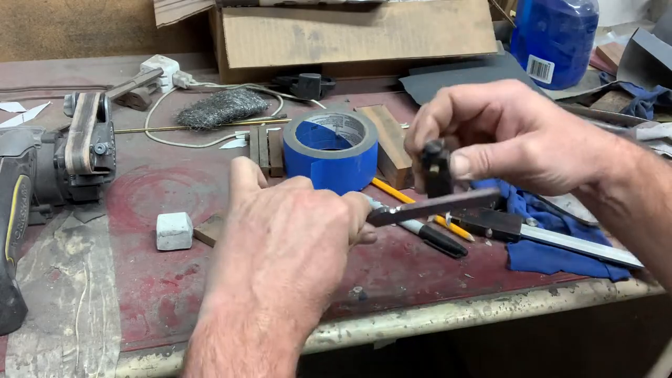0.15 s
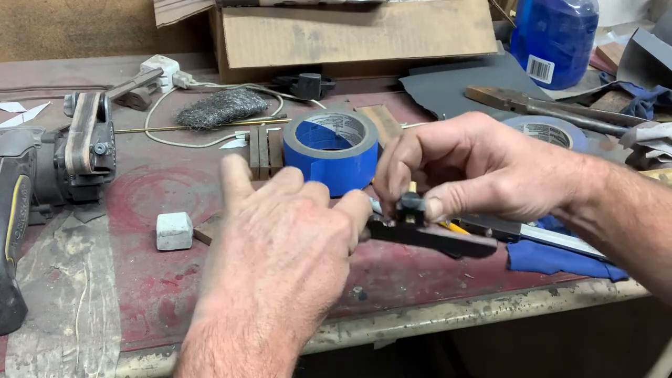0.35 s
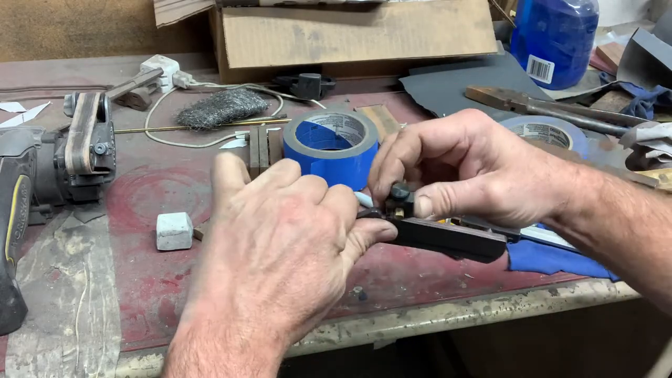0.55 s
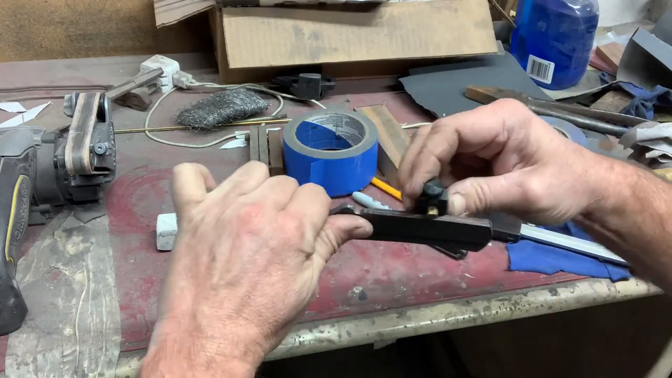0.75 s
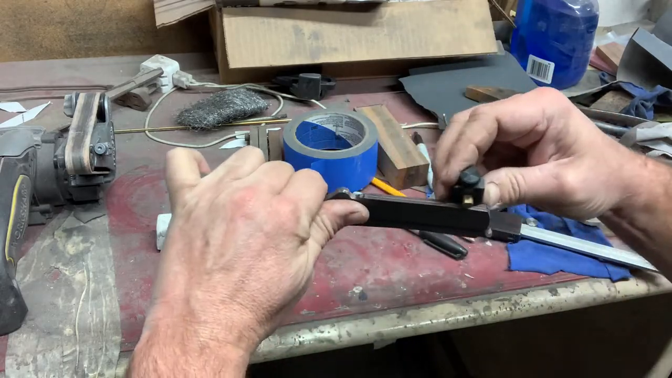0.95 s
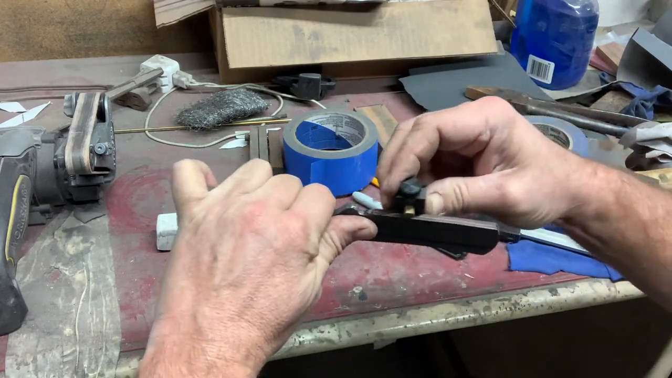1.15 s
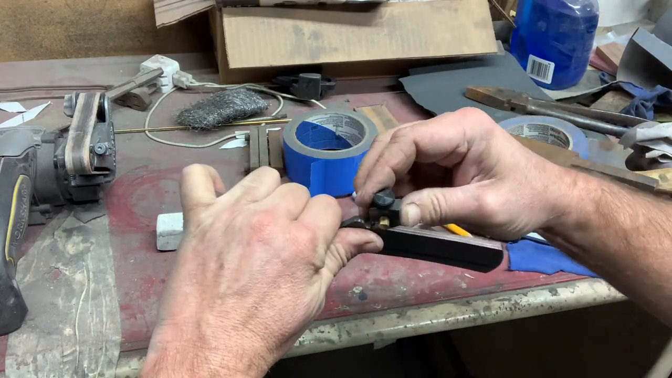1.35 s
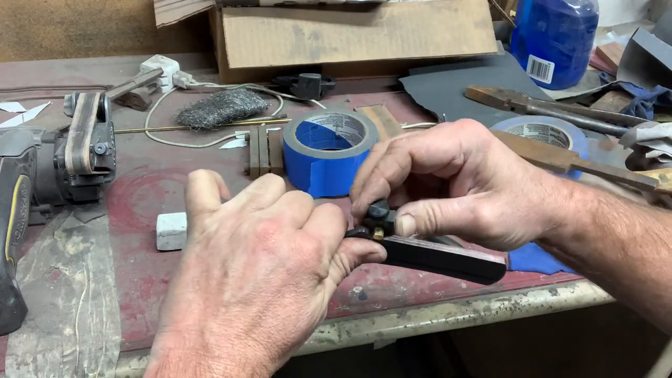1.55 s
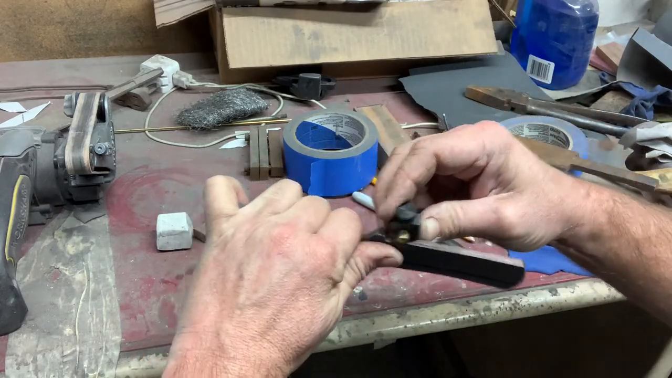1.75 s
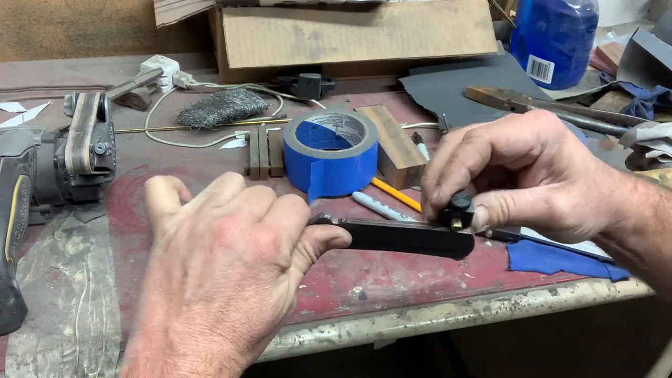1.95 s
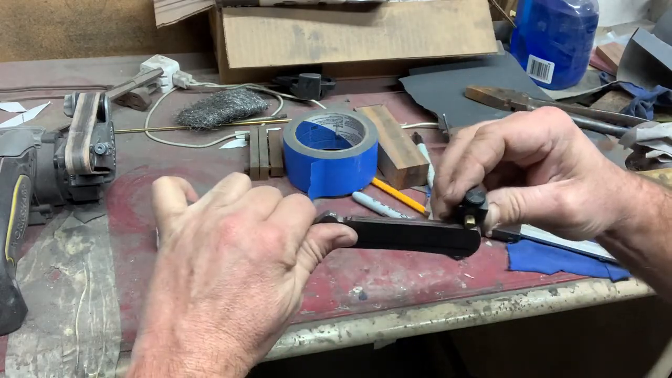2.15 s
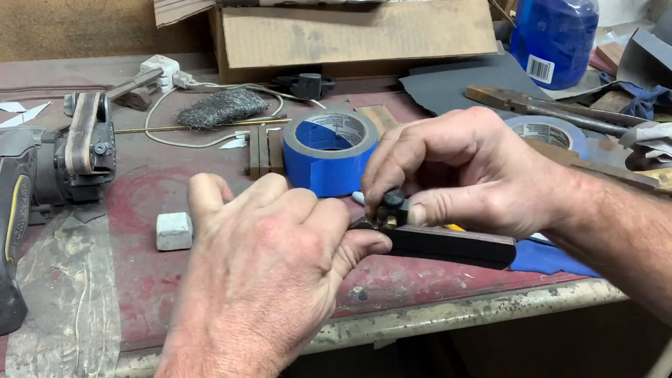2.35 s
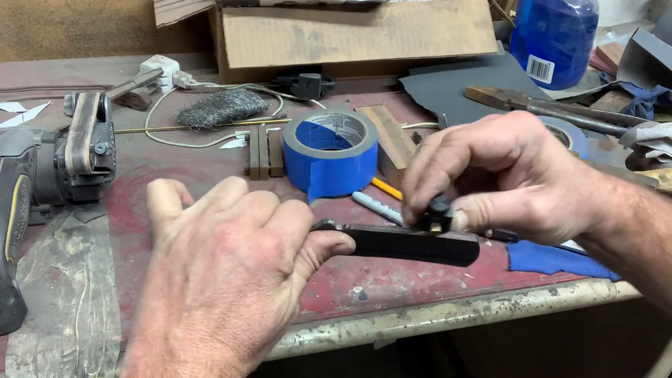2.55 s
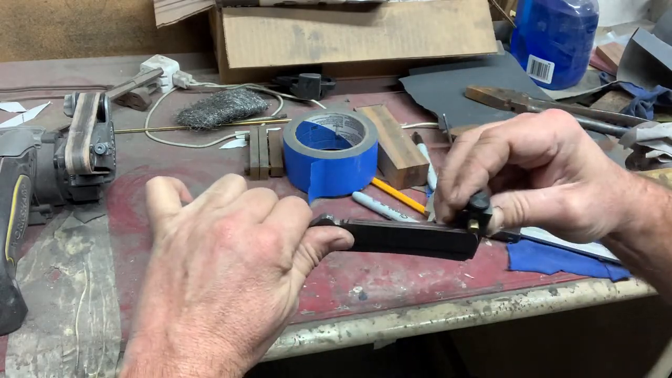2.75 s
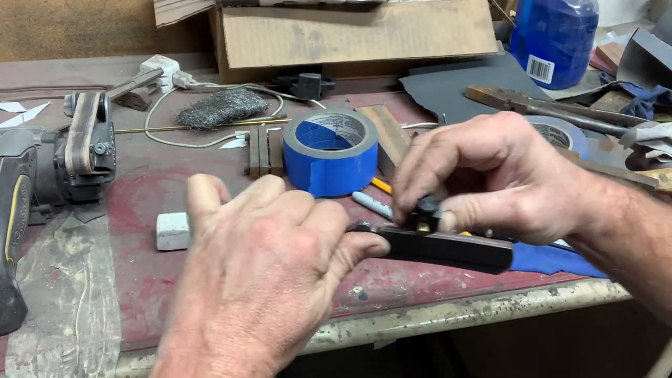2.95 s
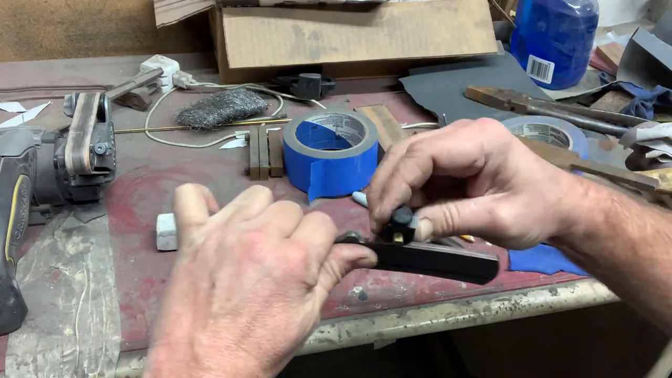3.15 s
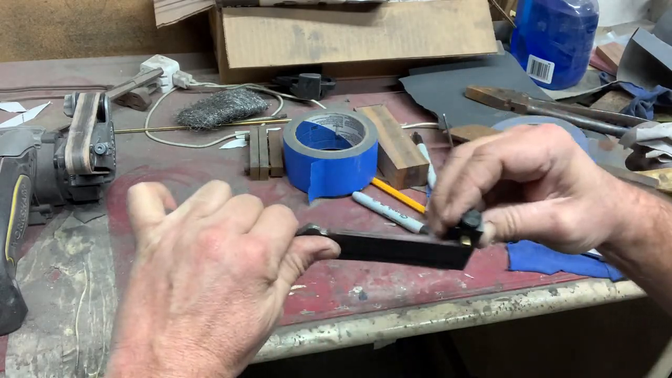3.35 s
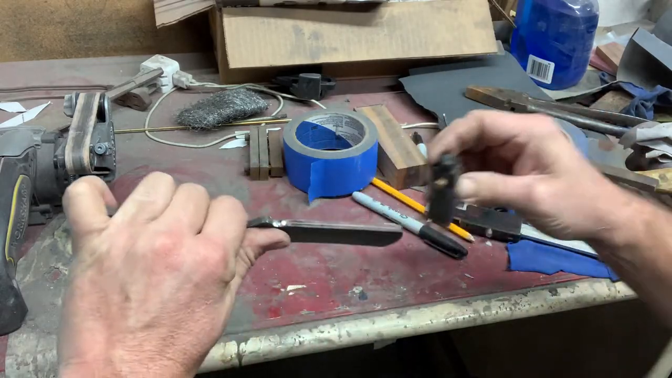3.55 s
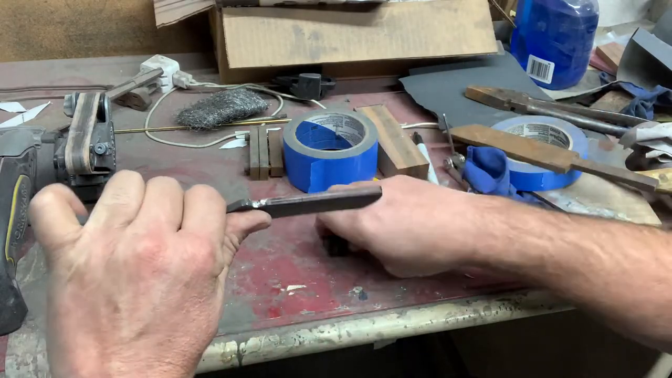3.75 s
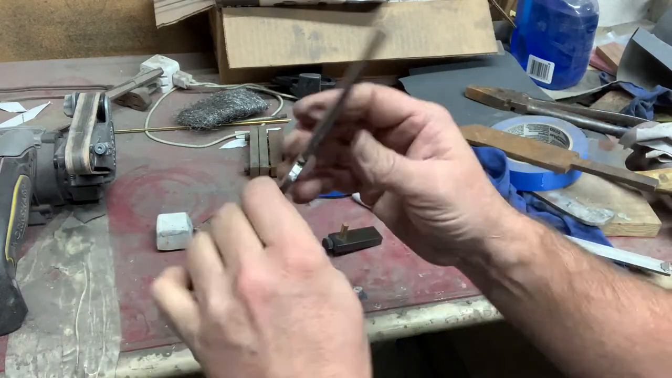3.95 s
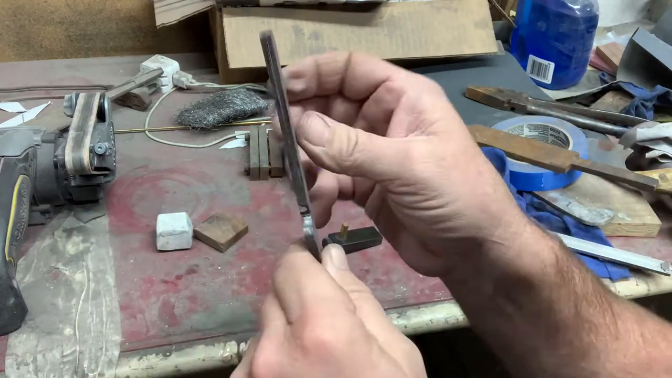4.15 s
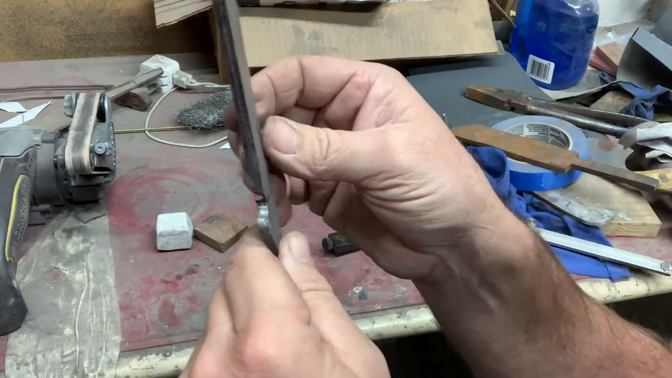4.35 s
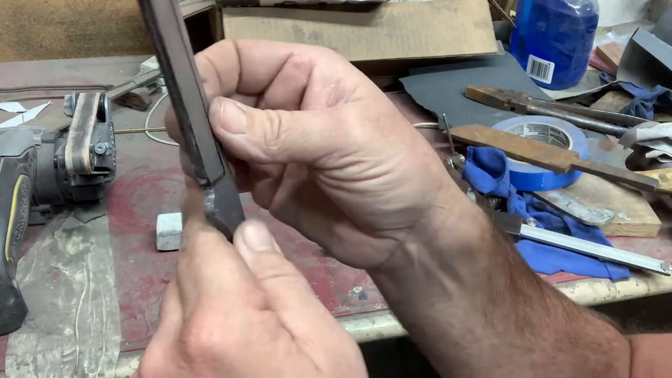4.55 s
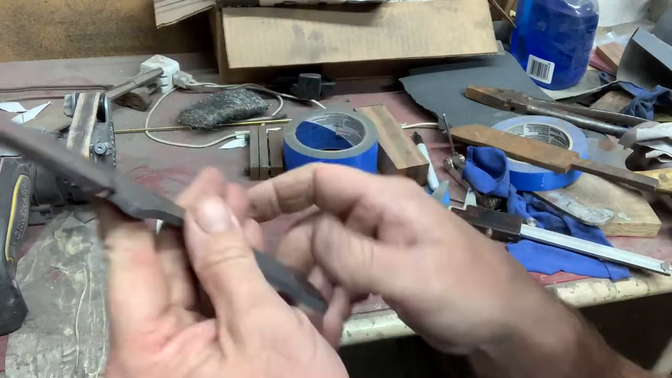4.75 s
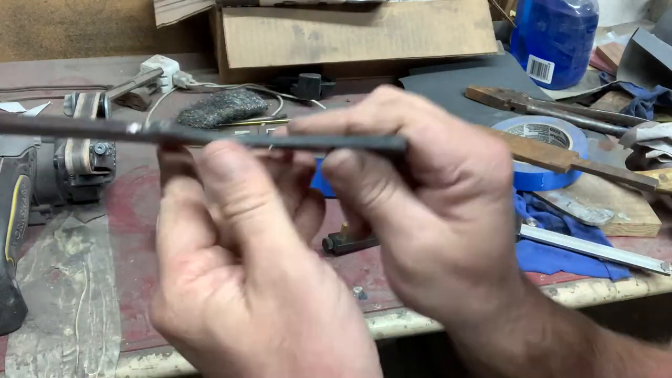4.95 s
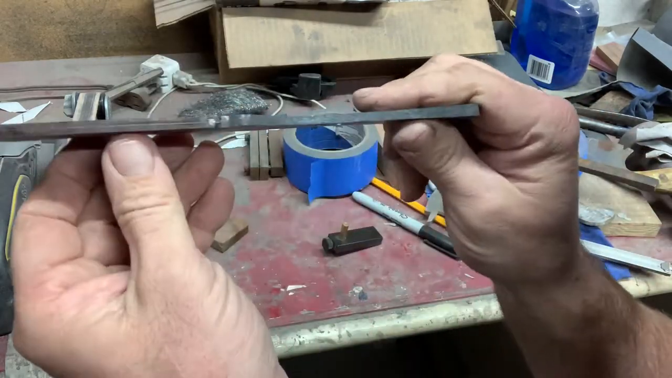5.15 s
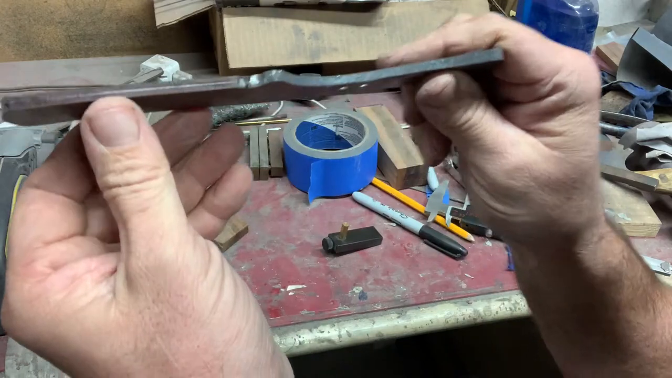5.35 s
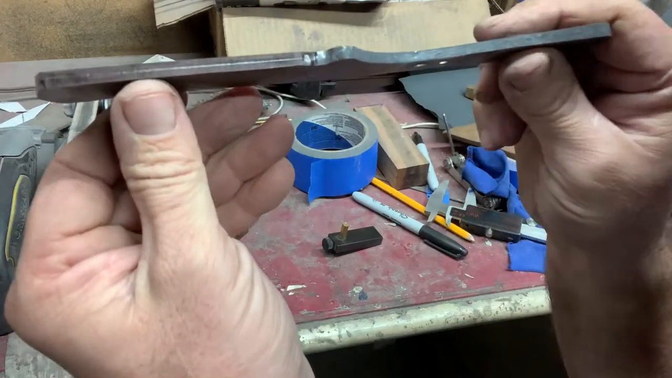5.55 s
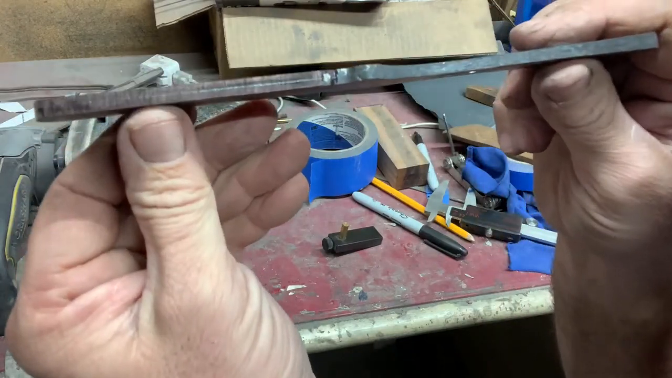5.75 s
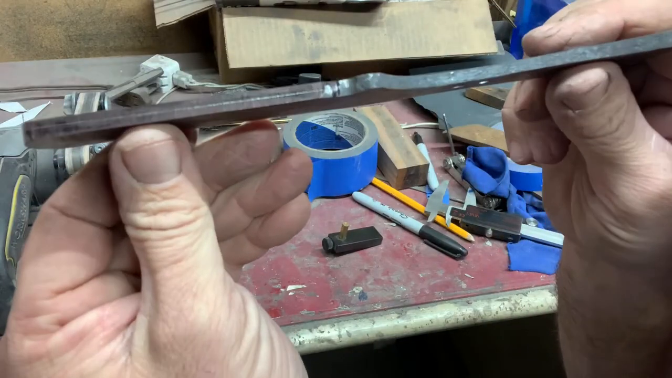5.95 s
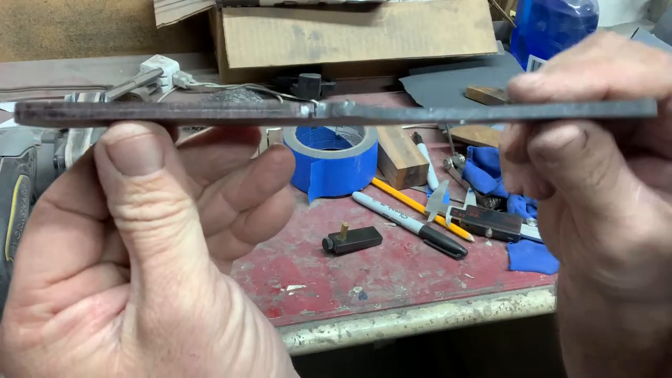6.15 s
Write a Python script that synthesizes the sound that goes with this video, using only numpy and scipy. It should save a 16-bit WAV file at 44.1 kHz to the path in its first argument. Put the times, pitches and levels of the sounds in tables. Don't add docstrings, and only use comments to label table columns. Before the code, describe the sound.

Short, sharp, gritty metal scrapes with bright clicks on a steel blank, then a knock on a bench and faint handling, over low workshop hum.

```python
import sys
import numpy as np
from scipy import signal
from scipy.fft import rfft, irfft, next_fast_len
from scipy.io import wavfile
from scipy.ndimage import uniform_filter1d

SR = 44100
rng = np.random.default_rng(int(sys.argv[2]) if len(sys.argv) > 2 else 0)


def store_wav(level_fs):
    pcm = np.round(np.clip(np.atleast_2d(level_fs), -1, 1) * 32767)
    wavfile.write(sys.argv[1], SR, pcm.T.astype(np.int16))


def natural_amplitude(level_db):
    exponent = np.asarray(level_db, float) / 20
    return 10 ** exponent


N = 273861


def evened(x):
    return x / np.sqrt(np.mean(x ** 2) + 1e-20)


def read(points, hz):
    f, value = np.transpose(points)
    return np.interp(np.log(hz + 1), np.log(f + 1), value)


def resonate(x, hz, width_hz):
    return signal.lfilter(*signal.iirpeak(hz, hz / width_hz, SR), x)


def coloured(points, shares=1):
    hz = np.fft.rfftfreq(512, 1 / SR)
    taps = np.fft.fftshift(irfft(natural_amplitude(read(points, hz)) * shares), axes=-1) * np.hanning(512)
    return taps / np.linalg.norm(taps, axis=-1, keepdims=True)


def envelope_db(start, length, level_db, change_db, rise, fall, lift_db=0, lift_s=0.03):
    t = np.arange(N) / SR - start
    after = np.maximum(t - length, 0)
    hold_db = level_db + change_db * np.clip(t / max(length, 1e-3), 0, 1)
    return hold_db + rise * np.minimum(t, 0) - lift_db * np.minimum(after / lift_s, 1) - fall * after


# frequency in Hz, level in dB per Hz.
AIR_SPECTRUM = [(15, -77.5), (25, -50), (48, -30.5), (61, -29.5), (76, -3), (202, -6), (265, -14.5),
                (408, -13.5), (443, -13), (741, -13), (1080, -16.5), (1210, -15.5), (3980, -28),
                (12100, -53), (16300, -64.5)]
# frequency in Hz, likeness from -1 to 1.
AIR_LIKENESS = [(60, 0.61), (110, 1), (200, 0.69), (380, 0.79), (700, 0.2), (1290, -0.33), (2380, -0.41),
                (4400, -0.044), (8120, 0.4), (15000, 1)]
# frequency in Hz, level in dB.
AIR_LEFT_DB = [(60, -2.5), (110, 0.5), (200, -0.5), (380, 2), (700, -2.5), (1290, -2.5), (2380, -2),
               (4400, -0.5), (8120, -1), (15000, -8)]


def air(level_db=-47.5, patchy_db=1.2, swell_db=0.35):
    frames, hz = N // 512 + 5, np.fft.rfftfreq(2048, 1 / SR)
    a, b, c, d, patches = rng.standard_normal((frames, 1025, 5)).T
    patches = evened(uniform_filter1d(uniform_filter1d(patches, 20, 0), 8, 1))
    swell = evened(uniform_filter1d(rng.standard_normal(frames), 20))
    same = np.clip(read(AIR_LIKENESS, hz), -1, 1)[:, None]
    left = a + 1j * b
    right = same * left + np.sqrt(1 - same ** 2) * (c + 1j * d)
    z = np.array([left, right])
    z *= natural_amplitude(read(AIR_SPECTRUM, hz)[:, None] + patchy_db * patches + swell_db * swell)
    z *= natural_amplitude(np.outer([0.5, -0.5], read(AIR_LEFT_DB, hz)))[:, :, None]
    rush = signal.istft(z, nperseg=2048, noverlap=1536)[1][:, :N]
    return natural_amplitude(level_db - 4) * evened(rush)


# frequency in Hz, width in Hz, level in dB.
HUM_LINES = [(94.2, 9.1, -65.5), (125.4, 18.5, -57), (162.04, 11.5, -55), (201.36, 6, -59),
             (240.2, 3.2, -67.5), (282.2, 29, -65), (364.4, 11, -70.5), (403.5, 1.54, -66), (713, 21, -70),
             (755.6, 25, -69.5), (820, 17, -77.5), (929, 7.1, -74.5), (1183, 21, -78.5)]


def hum():
    out = np.zeros(N)
    for hz, width_hz, db in HUM_LINES:
        line = resonate(rng.standard_normal(N), hz, width_hz)
        out += natural_amplitude(db) * evened(resonate(line, hz, width_hz))
    return out


# time in seconds, level in dB.
TOUCHES = [
    (5.621, -57),
    (5.826, -61),
]
# frequency in Hz, level in dB per Hz.
TOUCH_SPECTRUM = [(1200, -20), (2200, 0), (5000, -1), (9000, -6), (16000, -12)]


def touches(t60_s=0.03):
    t, out = np.arange(2000) / SR, np.zeros(N)
    for s, peak_db in TOUCHES:
        puff = np.convolve(rng.standard_normal(len(t)), coloured(TOUCH_SPECTRUM), "same")
        out[round(s * SR):][:len(t)] += natural_amplitude(peak_db - 60 * t / t60_s) * puff
    return out


# start in seconds, length in seconds, skin rub in dB, fine top in dB above the rub.
FINGER_RUBS = [
    (3.822, 0.047, -66, -5),
    (4.164, 0.065, -84, -11.5),
    (4.305, 0.075, -79.5, -17),
    (4.543, 0.018, -74, -13),
    (4.627, 0.035, -83, -9),
    (4.768, 0.043, -73.5, -14),
    (4.876, 0.038, -75, -12),
    (5.2, .04, -81, -29),
    (5.32, 0.032, -86, -11),
    (5.407, .03, -91, -10),
]
# frequency in Hz, level in dB per Hz.
SKIN_SPECTRUM = [(3000, -25), (7000, 1), (12000, -2), (16000, -15)]


def fingers(rise_db_per_s=606, fall_db_per_s=392):
    level = np.zeros((2, N))
    for start, length, rub_db, top_db in FINGER_RUBS:
        rub = envelope_db(start, length, rub_db, 0, rise_db_per_s, fall_db_per_s)
        level += natural_amplitude(rub + np.array([[0], [top_db + 11]]))
    level = uniform_filter1d(level, 200, axis=1)
    above = 1 / (1 + (13300 / (np.fft.rfftfreq(512, 1 / SR) + 1)) ** 24)
    colours = coloured(SKIN_SPECTRUM, np.array([1 - above, above]))
    noise = rng.standard_normal((2, N))
    return sum(signal.oaconvolve(gain * noise, taps[None], "same") for gain, taps in zip(level, colours))


# time in seconds, level in dB, contact in seconds, dullness in dB per octave.
BLOWS = [
    (3.7228, -15, .004, 0),
    (3.733, -31, .003, -5),
    (3.7575, -20.5, .0035, -8),
    (3.82, -50, .004, -2),
]
# frequency in Hz, level in dB, T60 in seconds.
BENCH_MODES = [(390, -32, .06), (560, -31, .03), (680, -31, .02), (830, -15.5, .025), (1180, -14, .015),
               (1340, -5, .012), (1400, -19, .04), (1690, -17, .05), (2068, -11.5, .18), (2130, -7, .012),
               (2155, -17, .14), (2770, -21, .1), (2860, 1.5, .012), (3090, -24, .06), (3600, -20, .03),
               (4250, -14, .012)]
# frequency in Hz, level in dB per Hz.
CLACK_SPECTRUM = [(150, -42), (400, -17), (1000, -12), (2090, -3), (2860, 0), (3600, -6), (4600, -12),
                  (16000, -50)]
# frequency in Hz, level in dB per Hz.
RATTLE_SPECTRUM = [(800, -8), (2000, 1), (4000, -1.5), (6000, -15), (9000, -36)]


def knock(clack_db=-8.5, clack_t60_s=0.0096, rattle_db=-14.5, rattle_t60_s=0.14):
    t, out = np.arange(8000) / SR, np.zeros(N)
    for s, blow_db, contact_s, dull_db in BLOWS:
        swell = np.sin(np.pi / 2 * np.minimum(t / contact_s, 1)) ** 2
        after = np.maximum(t - contact_s, 0)
        ring = np.zeros(len(t))
        for hz, db, t60_s in BENCH_MODES:
            mode_db = db + dull_db * max(np.log2(hz / 1000), -0.3) - 60 * after / t60_s
            ring += natural_amplitude(mode_db) * np.sin(2 * np.pi * hz * (t - contact_s) + (hz / 500) ** 2)
        clack = np.convolve(rng.standard_normal(len(t)), coloured(CLACK_SPECTRUM), "same")
        clack *= natural_amplitude(clack_db + 2 * dull_db - 60 * after / clack_t60_s)
        rattle = np.convolve(rng.standard_normal(len(t)), coloured(RATTLE_SPECTRUM), "same")
        rattle *= natural_amplitude(rattle_db + 2 * dull_db - 60 * after / rattle_t60_s)
        out[round(s * SR):][:len(t)] += natural_amplitude(blow_db) * swell * (ring + clack + rattle)
    return out


# time in seconds, peak in dB, favoured pitch in Hz, fall-off
# from it in dB per octave.
PINGS = [(.098, -28, 9600, 40), (.0978, -40, 6100, 14), (.1, -30, 8500, 62), (.0965, -50, 14900, 57),
         (.1827, -52, 14900, 60), (.1812, -22, 10360, 60), (.184, -42, 5500, 14), (.256, -52, 5900, 34),
         (.2535, -48, 10400, 42), (.31, -62, 5900, 40), (.34, -58, 8300, 60), (.3685, -42, 8300, 60),
         (.3687, -47, 4900, 62), (.443, -57, 5900, 25), (.545, -66, 10400, 42), (.55, -61, 5900, 25),
         (.59, -61, 5900, 30), (.608, -59, 5900, 40), (1.39, -60, 5900, 40), (4.1, -64, 10300, 51),
         (4.5374, -70, 10400, 33), (4.55, -62, 14900, 60), (4.632, -65, 10400, 50), (4.645, -66, 5900, 50),
         (4.658, -61, 10400, 48), (4.668, -64, 14900, 60), (4.768, -62, 10370, 61), (4.768, -58, 14900, 60),
         (4.768, -63, 5900, 40), (4.783, -62, 10400, 60), (4.793, -58, 5900, 38), (4.799, -57, 3800, 60),
         (4.8, -60, 14900, 60), (4.835, -59, 14900, 60), (4.845, -65, 10400, 60), (4.88, -59, 14900, 60),
         (4.8854, -68, 10400, 33), (4.915, -61, 14900, 60), (5.1, -64, 10400, 56), (5.4, -66, 10400, 56),
         (5.826, -64, 3800, 60)]
# frequency in Hz, level in dB, T60 in seconds.
FREE_MODES = [
    [(5890, 0, .1), (6030, -2, .13), (5600, 2, .015)],
    [(4900, -6, .04)],
    [(8300, -9, .06), (8550, 4, .015)],
    [(10335, -7, .13), (10430, -8, .1), (10400, 7, .016)],
    [(14880, 4, .1), (15100, 4, .06)],
    [(3800, 0, .06)],
]


def pings(flutter_db=5, soft_db=-57, hard_rise_s=0.00019, soft_rise_s=0.008):
    t, out = np.arange(9000) / SR, np.zeros(N)
    for s, peak_db, favoured_hz, fall_db in PINGS:
        rise = np.minimum(t / (hard_rise_s if peak_db > soft_db else soft_rise_s), 1)
        for group in FREE_MODES:
            db = peak_db - fall_db * abs(np.log2(group[0][0] / favoured_hz))
            ring = np.zeros(len(t))
            for hz, mode_db, t60_s in group:
                ring += natural_amplitude(mode_db - 60 * t / t60_s) * np.sin(2 * np.pi * (hz * t + rng.random()))
            waver = evened(uniform_filter1d(rng.standard_normal(len(t)), size=300)) - 1
            flutter = natural_amplitude(flutter_db * waver * np.minimum(t / 0.01, 1))
            out[round(s * SR):][:len(t)] += natural_amplitude(db + 2.0) * flutter * ring * rise
    return out


# frequency in Hz, level in dB per Hz.
SCRAPE_SPECTRUM = [(880, -48.5), (1500, -26), (1760, -22.5), (1930, -25), (2250, -18), (2960, -13),
                   (3600, -12.5), (4300, -11), (4800, -3), (5280, 2), (6510, 2), (7950, -7), (9140, -7.5),
                   (10700, -9), (12200, -15), (13600, -16.5), (14300, -12), (15300, -6), (16300, -28)]


def zones():
    hz = np.fft.rfftfreq(512, 1 / SR)
    above = [1 / (1 + (edge_hz / (hz + 1)) ** 24) for edge_hz in (1e-3, 4200, 8000, 13000, 1e9)]
    return coloured(SCRAPE_SPECTRUM, -np.diff(above, axis=0))


# touch-down in seconds, length in seconds, pressure in dB,
# pressure change over the stroke in dB, brightness in dB.
STROKES = [(0.176, 0.047, -64, -11, -5), (0.256, 0.017, -61, -3, 2), (0.337, 0.023, -72.5, 2, 9),
           (0.404, 0.047, -70, 5, 2), (0.593, 0.04, -78, -4, 3), (0.684, 0.067, -34, -5.5, -5),
           (0.784, 0.08, -51.5, -6, -2.5), (0.978, 0.054, -39, -1, -2), (1.042, 0.033, -34.5, -4.5, 2),
           (1.189, 0.0095, -35, -0.5, -5), (1.314, 0.0095, -58.5, 7.5, -3), (1.467, 0.0063, -54, 4, -10),
           (1.555, 0.019, -79, -7, 2), (1.76, 0.02, -44, 7.5, -1.5), (1.851, 0.068, -40.5, -3, -4),
           (1.927, 0.056, -61, -12, 3.5), (2.199, 0.064, -32.5, -7, 1.5), (2.283, 0.058, -37, -12, -1.5),
           (2.439, 0.089, -34.5, -4.5, -4), (2.549, 0.058, -47.5, -7.5, -5),
           (2.636, 0.051, -67.5, -1, -1.5), (2.851, 0.026, -56.5, 11.5, 4.5), (2.881, 0.064, -37, 3.5, 0.5),
           (2.953, 0.054, -42, -2, -3), (3.107, 0.0047, -35.5, -9, -1), (3.145, 0.028, -56, 6.5, -11),
           (3.203, 0.047, -34.5, -6.5, -3), (3.26, 0.044, -38, -14.5, 0), (3.333, 0.02, -46, -2, -4.5)]
# time in seconds, peak in dB, brightness in dB.
CATCHES = [(0.0968, -30.5, 8), (0.182, -27, 7.5), (0.3685, -42, 12.5), (0.82, -31, -12), (1.041, -26, 0),
           (1.1883, -15.5, 1.5), (1.197, -22.5, 6.5), (1.203, -24, -2), (0.689, -28, 0), (.8538, -43, -6),
           (1.012, -36, 0), (1.45, -45, -8), (1.6732, -46.5, 2), (1.7424, -20.5, -3.5), (1.844, -31, -9),
           (2.2813, -17, 1.5), (2.419, -45, 2), (2.4274, -31, -1), (2.432, -28, 0), (2.438, -25, -2),
           (2.96, -13.5, 2.5), (2.966, -17.5, -5), (2.976, -26, -9.5), (2.2027, -33, 6), (2.502, -29, 6),
           (3.3391, -39, 0), (1.766, -35, 0), (2.972, -19.5, -4.5), (2.992, -19.5, -1),
           (3.009, -19.5, -2.5), (3.104, -24, 0), (3.1532, -36, 3), (3.1848, -31, -3), (3.1983, -19.5, 6),
           (3.217, -19, 5), (3.223, -19, -2.5), (0.6764, -34, 0), (2.192, -38, 3.5), (2.8749, -27, 0),
           (1.388, -56, 1)]
ZONE_GAIN_DB = [1, -2.5, -1.5, 6]


def drive_levels():
    t, power = np.arange(3000) / SR, np.zeros((4, N))
    bend_per_db = -0.38
    point_per_db, dulling_db_per_s, catch_t60_s = 0.5, 13, 0.018
    for start, length, pressure_db, change_db, bright_db in STROKES:
        span = slice(max(round((start - 0.1) * SR), 0), round((start + length + 0.3) * SR))
        db = envelope_db(start, length, pressure_db, change_db, rise=1497, fall=390, lift_db=26.5)[span]
        drawn_s = np.clip(np.arange(span.start, span.stop) / SR - start, 0, length)
        bright = bright_db - dulling_db_per_s * drawn_s
        bend = -16 + bend_per_db * (db + 35)
        zone_db = np.array([bend, 0 * db, -1 + bright, -13.5 + point_per_db * bright])
        power[:, span] += natural_amplitude(2 * (db + zone_db))
    power = uniform_filter1d(np.sqrt(power), 200, axis=1) ** 2
    for s, peak_db, bright_db in CATCHES:
        bend = -16 + bend_per_db * (peak_db + 25)
        zone_db = np.array([bend, 0, -3.5 + bright_db, -10.5 + point_per_db * bright_db])
        burst_db = peak_db - 4.5 - 60 * t / catch_t60_s + zone_db[:, None]
        power[:, round(s * SR):][:, :len(t)] += natural_amplitude(2 * burst_db) * np.minimum(t / 0.0018, 1) ** 2
    return np.sqrt(power) * natural_amplitude(np.array(ZONE_GAIN_DB))[:, None]


def moving_contact(x, patchy_db, size, count=14):
    z = signal.stft(x, nperseg=size, noverlap=size * 3 // 4)[2]
    patches = rng.standard_normal(z.shape[:0:-1]).T
    patches = evened(uniform_filter1d(uniform_filter1d(patches, size=3, axis=0), size=count, axis=1))
    return signal.istft(z * natural_amplitude(patchy_db * patches), nperseg=size, noverlap=size * 3 // 4)[1][:, :N]


# frequency in Hz, width in Hz, level in dB.
BLADE_MODES = [(2980, 200, -3.5), (5500, 79, -13.5), (5910, 120, 2.5), (6170, 60, -7), (6364, 150, 2),
               (6660, 50, -10.5), (6970, 60, -4), (7390, 120, -6.5), (8580, 95.3, -7.5), (9080, 200, -5.5),
               (10330, 140, 6.5), (14560, 150, 1), (15200, 250, 0.5)]
# time in seconds, level in dB.
GRIP_DB = [
    (0, -5),
    (.7, -6),
    (1.05, 3),
    (1.2, 1),
    (1.8, 1.5),
    (2.3, -0.5),
    (2.9, 0.5),
    (3.25, 4),
]


def scribe(grains_per_s=14000, spread_db=4.0, chatter_db=1.5, blade_db=-8.5):
    size = natural_amplitude(spread_db * np.minimum(rng.exponential(1, (2, N)), 3)) * rng.choice([-1, 1], (2, N))
    chatter = natural_amplitude(chatter_db * evened(uniform_filter1d(rng.standard_normal(N), 120)))
    grit = evened(size * (rng.random((2, N)) < grains_per_s / SR) * chatter)
    levels = drive_levels()
    tool = sum(signal.oaconvolve(level * grit, taps[None], "same") for level, taps in zip(levels, zones()))
    levels[0] *= natural_amplitude(np.interp(np.arange(N) / SR, *np.transpose(GRIP_DB)))
    blade = np.zeros(N)
    for hz, width_hz, db in BLADE_MODES:
        zone = np.searchsorted([4200, 8000, 13000], hz)
        even_power = np.sqrt(SR / (2 * np.pi * width_hz))
        blade += natural_amplitude(db) * even_power * resonate(levels[zone] * grit[0], hz, width_hz)
    steel = tool + natural_amplitude(blade_db) * blade * [[1], [0]]
    steel = moving_contact(steel, patchy_db=2.5, size=256)
    steel = moving_contact(steel, patchy_db=4.5, size=1024)
    return signal.sosfilt(signal.butter(2, 1000, "high", fs=SR, output="sos"), steel)


def ports(shared, phase, left_db, apart=0, same=((1, 1), (2, 1))):
    size = next_fast_len(N)
    hz = np.fft.rfftfreq(size, 1 / SR)
    half = natural_amplitude(read(left_db, hz) / 2) * np.exp(0.5j * np.interp(hz, *np.transpose(phase)))
    like = np.clip(read(same, hz), 0, 1)
    both = np.sqrt((1 + like) / 2) * rfft(shared, size)
    other = np.sqrt((1 - like) / 2) * rfft(apart + 0 * shared, size)
    return irfft(np.array([(both + other) * half, (both - other) / half]), size)[:, :N]


# frequency in Hz, T60 in seconds.
ROOM_T60 = [(300, 0.79), (2000, 0.26), (6000, 0.21), (15000, 0.13)]


def room(x):
    taps = np.zeros((2, 20000))
    at = np.arange(160, 19980, 20) + rng.integers(0, 20, (2, 991))
    np.put_along_axis(taps, at, rng.choice([-1., 1.], at.shape), 1)
    hz, t, z = signal.stft(taps, SR, nperseg=256)
    decay = natural_amplitude(-60 * t / read(ROOM_T60, hz)[:, None])
    tail = signal.istft(z * decay, SR, nperseg=256)[1]
    return signal.fftconvolve(x[None], tail / np.linalg.norm(tail[0]), axes=1)[:, :N]


# frequency in Hz, phase in rad by which left leads.
STEEL_PHASE = [(0, 0), (1700, -2.8), (2700, -.5), (3700, -.6), (4400, -1.8), (5500, .2), (6500, -.3),
               (7500, 2.4), (8400, 2.4), (9800, 1.2), (11500, 2.2), (14000, 2.3), (16000, 2.7)]
# frequency in Hz, level in dB.
STEEL_LEFT_DB = [(60, 2), (150, -1), (380, -3.5), (950, -2.5), (2380, 0), (5980, -3.5), (15000, -0.5)]
# frequency in Hz, likeness from 0 to 1.
STEEL_LIKENESS = [(2000, 0.24), (3000, 1), (4500, 0.44), (6100, 0.39), (7100, 0.11), (9500, 0.3),
                  (12000, 0.55), (14500, 0.92)]
# frequency in Hz, phase in rad by which left leads.
BENCH_PHASE = [(0, 0), (830, -.1), (1200, -1.7), (1800, -4.7), (2100, -4.9), (2800, -6.8), (3100, -6.4),
               (3600, -4.8), (4250, -5.2), (6000, -6.6), (16000, -8)]
# frequency in Hz, level in dB.
BENCH_LEFT_DB = [(400, -1.5), (830, 1), (1350, -13), (2100, -2), (2800, -1), (3500, -4), (7000, -3)]


def scene():
    steel, apart = scribe() + fingers()
    steel = steel + pings() + touches()
    bench = knock()
    near = ports(steel, STEEL_PHASE, STEEL_LEFT_DB, apart, STEEL_LIKENESS)
    near += ports(bench, BENCH_PHASE, BENCH_LEFT_DB)
    reverb = natural_amplitude(-15) * room(bench) + natural_amplitude(-9.5) * room(steel)
    hiss = natural_amplitude(-93) * rng.standard_normal((2, N))
    return near + reverb + air() + hum() + hiss


def band_limit(x):
    return signal.sosfilt(signal.butter(12, 16470, fs=SR, output="sos"), x)


def record(dry):
    lowpass = signal.firwin(1201, 15860, window=("kaiser", 7), fs=SR)
    limited = signal.oaconvolve(dry, lowpass[None], "same")
    return band_limit(limited)


dry = scene()
out = record(dry)
store_wav(out)
```